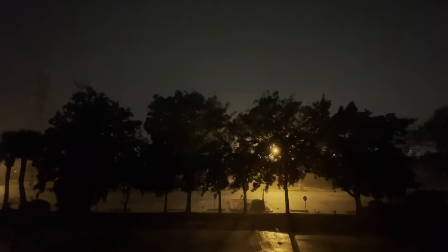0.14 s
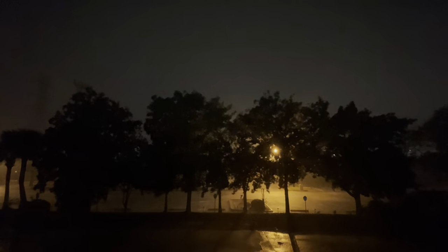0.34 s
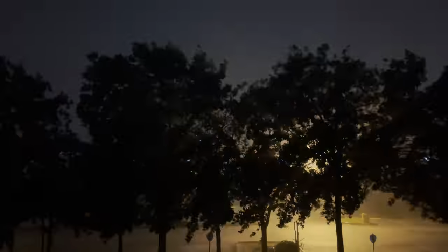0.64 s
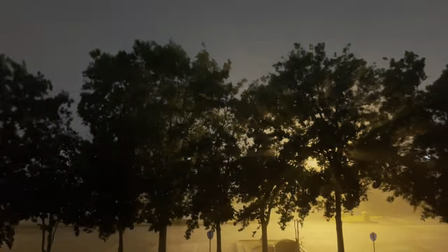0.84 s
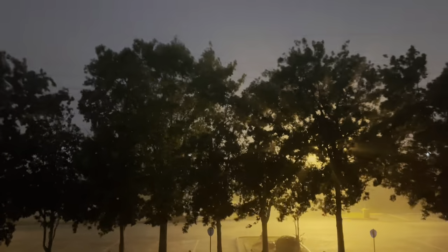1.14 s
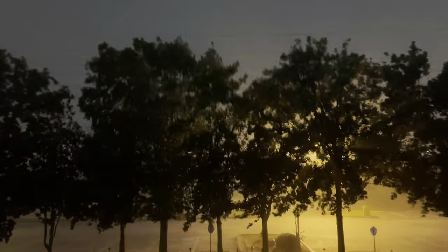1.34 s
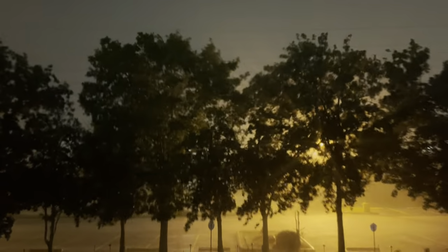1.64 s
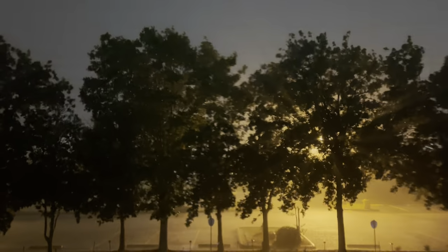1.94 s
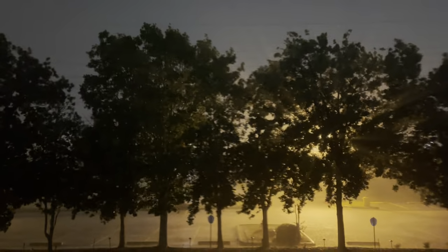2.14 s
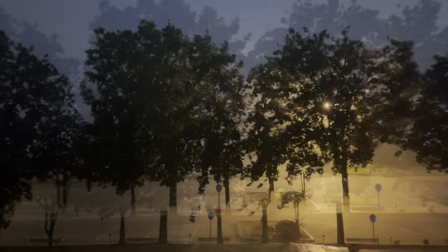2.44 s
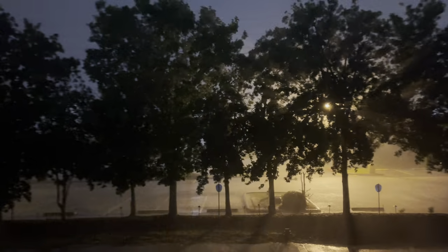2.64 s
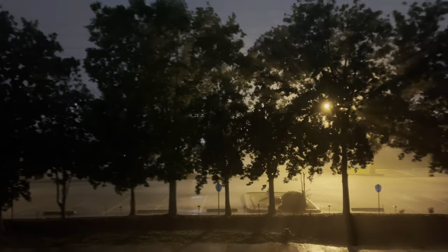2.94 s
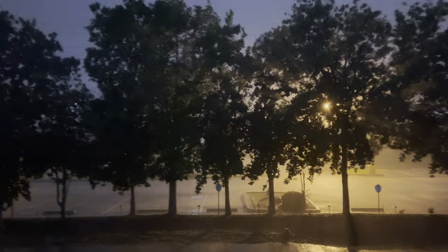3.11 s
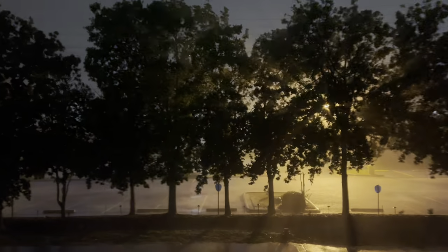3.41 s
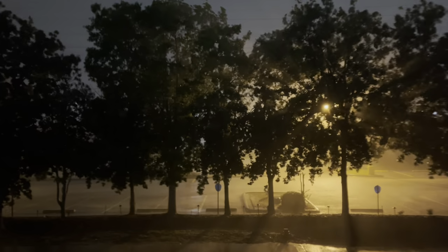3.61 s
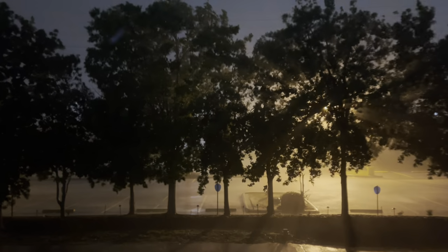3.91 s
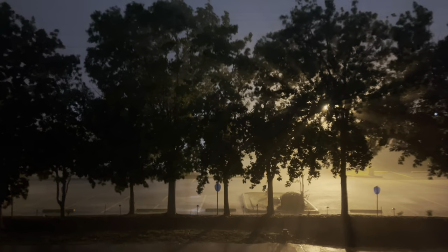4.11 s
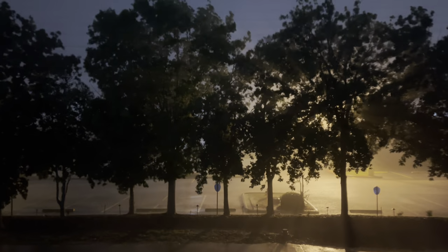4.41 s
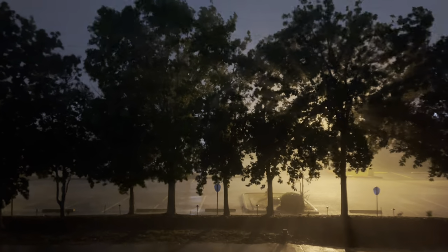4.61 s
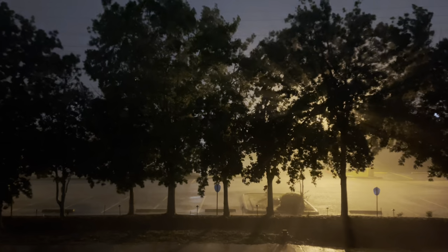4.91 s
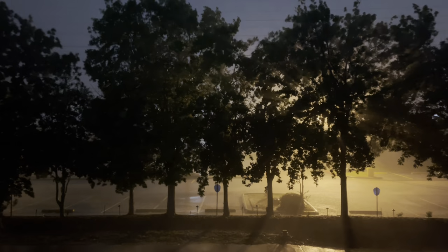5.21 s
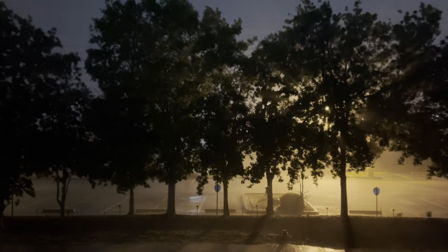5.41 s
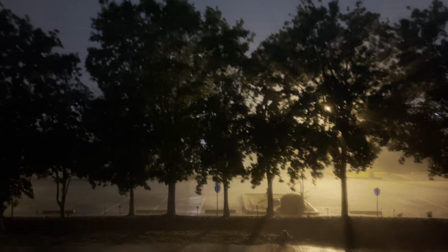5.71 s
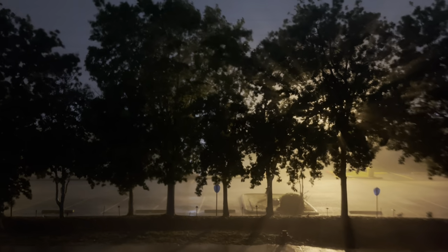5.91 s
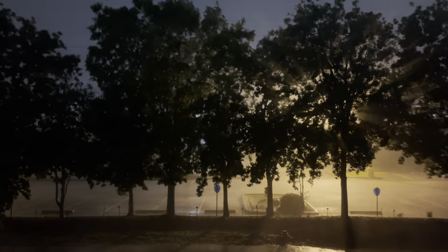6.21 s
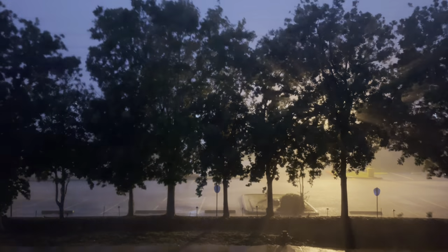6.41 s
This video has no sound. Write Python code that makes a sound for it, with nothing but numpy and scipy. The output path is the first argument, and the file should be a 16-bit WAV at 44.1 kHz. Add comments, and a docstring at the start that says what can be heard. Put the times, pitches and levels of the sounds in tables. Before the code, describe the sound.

Heavy rain falls steadily, heard from under a thin shelter. It drums on the sheet overhead and patters and hisses on the leaves and paving around, while small drops tick close to the microphone. The sound dips briefly near the start, then one big drop gives a sharp, hollow click. A dull double bump comes midway, and bigger drops tap overhead more often afterwards. Distant thunder rumbles low throughout.

```python
"""Night rain under a thin shelter

Heavy rain drums on the sheet overhead, patters and hisses on the leaves and paving around, and ticks
close to the microphone. One big drop raps something hollow, there is a dull double bump, and far thunder
rolls underneath. The hand-held pair of microphone ports is held in three grips in turn, each with its
own colour and stereo image. The level dips briefly, once."""
import sys
import numpy as np
from scipy import signal
from scipy.fft import rfft, irfft, next_fast_len
from scipy.io import wavfile

SR = 44100
rng = np.random.default_rng(int(sys.argv[2]) if len(sys.argv) > 2 else 0)


def generate_wav(sig):
    """Save sig (samples, or channels by samples) to the path in sys.argv[1] as 16-bit PCM at SR."""
    pcm = np.round(np.clip(np.atleast_2d(sig).T, -1, 1) * 32767).astype(np.int16)
    wavfile.write(sys.argv[1], SR, pcm)


N = 288855

# low and high modes of the sheet overhead: f/Hz, level/dB, t60/s
SHEET_LOW_MODES = [(245, 3, 0.017), (345, 3, 0.045), (432, 2.5, 0.029), (513, -0.5, 0.032),
                   (640, -5.5, 0.053), (734, -6, 0.057), (918, -3.5, 0.018)]
SHEET_HIGH_MODES = [(1107, -4.5, 0.017), (1390, 5.5, 0.0066), (1800, 1.5, 0.016), (2250, -16, 0.0096),
                    (2744, 3, 0.0095), (3500, -16, 0.0007)]
# big drops on it: t/s, favoured low f/Hz, its level/dB, favoured high f/Hz, its level/dB
HEAVY_DROPS = [(.283, 700, -30, 1400, -31), (.302, 500, -35, 1300, -31), (0.668, 600, -53, 1640, -29.5),
               (.853, 751, -29, 1660, -35), (.906, 600, -51, 1740, -30), (0.985, 600, -33, 1510, -29),
               (1.03, 905, -33, 1810, -31), (1.12, 705, -29, 1720, -27), (1.137, 764, -31, 1500, -19.5),
               (1.217, 634, -24, 1810, -24.5), (1.281, 890, -29, 1310, -25), (1.395, 600, -29, 1510, -31),
               (1.46, 600, -47, 1820, -35), (1.51, 900, -35, 1880, -30.5), (1.661, 301, -52, 1760, -24),
               (1.843, 830, -27.5, 1410, -24), (1.883, 600, -42, 1870, -29), (1.91, 800, -33, 1760, -21),
               (1.932, 714, -31, 1200, -26), (1.944, 513, -24, 1420, -22.5), (2.0098, 600, -53, 2570, -48),
               (2.046, 600, -28, 1850, -24), (2.091, 930, -27, 1300, -50), (2.187, 308, -62, 1800, -29),
               (2.225, 497, -34, 1930, -28), (2.326, 450, -28, 1930, -26), (3.383, 313, -34.5, 2250, -23),
               (3.639, 390, -26, 2150, -21.5), (3.663, 370, -25, 2140, -32), (3.727, 402, -24, 1800, -45),
               (3.775, 620, -22, 1200, -25), (3.953, 367, -23, 2340, -29), (4.081, 398, -29, 2150, -24.5),
               (4.234, 487, -23.5, 2400, -29), (4.2525, 597, -39, 1300, -33), (4.502, 345, -22, 1770, -20),
               (4.617, 436, -23, 2260, -25.5), (4.668, 610, -19, 2110, -35), (4.692, 434, -24, 2200, -27.5),
               (4.829, 307, -36, 1800, -23), (4.865, 432, -20.5, 1340, -20), (4.933, 470, -27, 2230, -29),
               (5.2132, 700, -35, 1200, -29), (5.218, 410, -21, 2020, -25.5),
               (5.552, 336, -25, 2180, -24.5), (5.634, 345, -20, 2150, -23.5), (5.681, 468, -24, 2180, -22),
               (5.725, 546, -19.5, 1910, -37), (5.752, 447, -44, 2130, -25.5),
               (5.837, 348, -20.5, 2170, -24), (5.926, 450, -21, 1320, -23.5), (5.975, 520, -24, 2450, -22),
               (6.103, 310, -20, 2520, -19.5), (6.154, 363, -30, 2020, -22), (6.305, 405, -23.5, 2250, -32),
               (6.4795, 695, -28.5, 2160, -21)]


def heavy_drops(fall_db_per_octave=19, slap_db=-11, slap_t60_s=0.042):
    """Big drops slap the sheet and strike hardest the modes nearest those favoured where they land."""
    s, low_hz, low_db, high_hz, high_db = np.transpose(HEAVY_DROPS)
    at, out = np.round(s * SR).astype(int) + 25, np.zeros(N)
    modes = SHEET_LOW_MODES + SHEET_HIGH_MODES
    chance_db = rng.normal(0, 1, (len(at), len(modes)))
    for k, (hz, _, t60) in enumerate(modes):
        favoured_hz, top_db = (low_hz, low_db) if k < len(SHEET_LOW_MODES) else (high_hz, high_db)
        strength_db = top_db - fall_db_per_octave * abs(np.log2(hz / favoured_hz)) + chance_db[:, k]
        out += (-1) ** k * ring(clicks(at, strength_db), hz, t60)   # neighbours start in opposite sense
    slap = decay(clicks(at, high_db + slap_db) + 1e-18, slap_t60_s) * rng.standard_normal(N)
    out += butter(slap, 2, [500, 3500], "band")
    return butter(out, 2, 6000)   # the wet contact is soft


def drumming(level_db, per_s, modes):
    """Steady rain overhead: each drop lands somewhere else on the sheet, so it favours other modes."""
    hits = impacts(per_s, spread_db=2.5)
    rings = sum(from_db(db) * ring(hits * rng.standard_normal((2, N)), hz, t60) for hz, db, t60 in modes)
    return from_db(level_db) * rms_one(butter(rings, 4, 6000))


# small drops right by the microphone: t/s, peak/dB, lower edge/Hz, upper edge/Hz, gain at 6 kHz/dB
CLOSE_TICKS = [(.2438, -23, 5000, 12000, -2), (.2838, -33, 4000, 8000, -5), (0.303, -21, 1500, 7000, 0),
               (0.37, -22, 5000, 12500, -6), (1.303, -9.5, 4750, 14000, -3), (1.778, -19, 2170, 10000, -4),
               (1.843, -21.5, 900, 7000, -7), (1.9112, -17, 1200, 11000, -10),
               (1.9332, -19, 2000, 7000, -5), (1.9452, -22, 1500, 6000, 0), (1.968, -23, 2500, 7000, -2),
               (2.0468, -35, 1000, 4500, -4), (2.255, -18, 1300, 9000, -17), (2.375, -27, 4500, 8000, 0),
               (2.442, -9, 2660, 9600, -7), (2.503, -30, 2500, 9000, -2), (2.517, -33, 6500, 11000, 7),
               (2.533, -29, 3000, 9000, -6), (2.5436, -24, 2500, 9500, -8), (2.551, -24, 2300, 9500, -7),
               (2.557, -25, 3000, 9500, -8), (2.5852, -17, 2900, 11000, -11),
               (2.6082, -18, 2800, 10500, -7), (2.6167, -18, 2500, 10000, -13),
               (2.6265, -24, 2600, 10000, -13), (2.6533, -29, 2600, 9000, -8),
               (3.429, -22, 1800, 12500, -10), (3.4925, -18.5, 6500, 12400, 0),
               (3.505, -23, 6500, 11000, -3), (3.6012, -18, 8400, 12300, 3),
               (3.6045, -17, 10000, 12400, -2), (3.7561, -23, 2200, 4000, -6),
               (4.0947, -20, 4000, 10000, -3), (4.252, -25, 1200, 4000, 2), (4.2538, -16, 2600, 11100, -8),
               (4.2825, -15, 2200, 12000, -12), (4.2857, -24, 1800, 9500, 10),
               (4.533, -16.5, 1800, 8500, -2), (4.6802, -23, 4000, 8000, 0), (4.728, -22.5, 5600, 7500, 0),
               (5.213, -27, 8500, 12400, 12), (5.892, -11.5, 2020, 3280, 8), (5.974, -24, 1300, 3200, 7),
               (6.1029, -17, 1100, 2880, 9), (6.479, -25, 5000, 9500, 20)]


def ticks(t60_s=0.007, length=1024):
    """A small drop bursts with a snap and a spit of noise, often hollow in the middle of its band."""
    out = np.zeros(N)
    spits = rng.standard_normal((len(CLOSE_TICKS), length)) * from_db(-60 * np.arange(length) / SR / t60_s)
    spits[:, 0] = 5   # the opening snap
    middle = signal.iirpeak(6000, Q=2, fs=SR)
    for spit, (s, peak_db, low_hz, high_hz, middle_db) in zip(spits, CLOSE_TICKS):
        tick = butter(spit, 3, [low_hz, high_hz], "band")
        tick = butter(butter(tick, 1, 7000), 5, 12300)   # softened above 7 kHz, cut steeply above 12.3
        tick -= (1 - from_db(middle_db)) * signal.lfilter(*middle, tick)
        at = round(s * SR) + 30
        out[at:at + length] += from_db(peak_db) * tick / abs(tick).max()
    return out


# modes of something hard and hollow close by: f/Hz, level/dB, t60/s
HOLLOW_MODES = [(517, -1, 0.033), (704, -6, 0.0165), (1500, -14, 0.033), (1810, -1.5, 0.012),
                (2500, 6.5, 0.0058), (2970, -19, 0.0078)]


def knock(at_s=1.3036, strike_db=-10.5):
    """One very big drop strikes all modes of the hollow thing at once, low and high in opposite sense."""
    strike = clicks(round(at_s * SR), strike_db)
    rings = sum((1 if hz < 1000 else -1) * from_db(db) * ring(strike, hz, t60)
                for hz, db, t60 in HOLLOW_MODES)
    return butter(rings, 3, [300, 4200], "band")   # too small to radiate bass; soft wet contact


# a dull double bump at the microphone: t/s, level/dB, f/Hz, t60/s
BUMPS = [(3.1872, -16, 200, .03), (3.1942, -14, 130, .04)]


def thud():
    """Two soft, low knocks that pull inward first and die quickly."""
    knocks = sum(ring(-clicks(round(s * SR), db), hz, t60) for s, db, hz, t60 in BUMPS)
    return butter(knocks, 2, [70, 380], "band")


# spectrum of rain on the leaves and paving around the shelter: f/Hz, density/dB
PATTER_SPECTRUM = [(200, -6.5), (400, 1), (900, -5.5), (1300, -3), (2100, -1), (2800, -3.5), (3800, -7.5),
                   (5000, -14.5), (7000, -30)]


def patter(level_db, gust):
    """Drops of very uneven size splash on leaves and paving, swelling with the gusts."""
    flicker_db = 1.4 * gust + 0.076 * drift(27)
    return splashes(level_db + flicker_db, PATTER_SPECTRUM, per_s=550, spread_db=5.5, far=1.5)


# close splashes as heard, with the top cut off steeply near 12.5 kHz: f/Hz, density/dB
SPATTER_SPECTRUM = [(500, -14), (1000, 2), (2000, 5.5), (4000, -11), (7000, -9), (11500, -4), (12500, -40)]


def spatter(level_db, gust):
    """Scattered close splashes, sparse enough to be heard singly."""
    return splashes(level_db + 0.5 * gust, SPATTER_SPECTRUM,
                    per_s=35, spread_db=3.5, far=0.046, t60_s=0.041)


# rain hiss as heard, with the top cut off steeply near 12.6 kHz: f/Hz, density/dB
HISS_SPECTRUM = [(3000, 1.5), (4500, 1), (6000, 0), (7000, -1), (8500, 0), (10500, -0.5), (11500, -4.5),
                 (12100, -12.5), (12600, -16), (13100, -50)]


def hiss(patter_db, gust, mean_db=-44):
    """Far drops merge into a flickering hiss that follows half of the patter's swing."""
    level_db = mean_db + 0.5 * (patter_db - patter_db.mean())
    flicker_db = 0.087 * gust + 1.16 * drift(37)
    return splashes(level_db + flicker_db, HISS_SPECTRUM, per_s=800, spread_db=1.5, far=1.6)


# spectra of the far thunder, its roll and its deepest part: f/Hz, density/dB
ROLL_SPECTRUM = [(44, -7.5), (75, 0), (119, 0), (194, -13), (260, -7.5), (340, -23), (570, -120)]
DEEP_SPECTRUM = [(22, -20), (30, -9), (48, 5), (61, 17.5), (70, -4), (85, -14), (110, -38)]
# thunder as it reaches the shelter: t/s, roll level/dB, deep level/dB
THUNDER_LEVELS = [(0, -33.5, -50), (.45, -36.5, -45), (1, -35.5, -43), (1.4, -35.5, -35.5),
                  (1.8, -32.5, -48), (2.25, -34, -90), (2.6, -37, -42), (3.1, -37, -44),
                  (3.55, -39.5, -40.5), (4, -36.5, -41), (4.3, -34, -40), (4.9, -35, -42), (5.4, -35, -39),
                  (5.7, -35, -40), (6.1, -37, -45), (6.55, -35.5, -41)]


def thunder():
    """Far thunder: low noise that rolls in slow lumps over a deeper, slower part."""
    roll_db, deep_db = in_time(THUNDER_LEVELS)
    roll = from_db(roll_db + drift(5)) * colour(rng.standard_normal((2, N)), ROLL_SPECTRUM)
    return roll + from_db(deep_db) * colour(rng.standard_normal((2, N)), DEEP_SPECTRUM)


# the microphone in each grip: f/Hz, right lead/rad, likeness/0-1, left over right/dB, colour/dB
FIRST_GRIP = [(20, 0, 1, 0, 0), (150, 0, .99, 0, 0), (300, 0, .9, 0, -2), (500, 1.2, .6, 1, -1),
              (800, 2.9, .3, 2, 4), (1500, 6.2, .6, 0, 2), (1900, 6.2, .9, 1, 0), (2900, 3.4, .5, -3, 3),
              (4000, 3, .2, -1, -2), (5200, -.3, .5, 0, 0), (6500, -.7, .45, -2, 0),
              (8500, -2.7, .65, -1, -2), (9800, -3.2, .95, 0, -1), (11400, -5.3, .75, 0, 0),
              (11900, -6, .93, 0, 1)]
SECOND_GRIP = [(20, 0, 1, 0, 0), (150, 0, .997, 0, 0), (400, .1, .95, 0, 0), (900, .5, .6, 1, 1),
               (1400, .2, .9, 0, 1), (1800, 0, .99, 0, 3), (2150, 0, .95, 0, -1), (2550, -.7, .7, -2, 2),
               (2900, -1.3, .35, -3, -1), (3600, -.4, .5, 2, 0), (4750, -3.14, .8, 0, -1),
               (5300, -5.3, .6, 0, 0), (5750, -6.28, 1, 0, 1), (6250, -6.28, 1, 0, 1),
               (7000, -7.4, .8, 0, 0), (8400, -9.42, 1, 0, -1), (9550, -9.43, 1, 0, -1),
               (10200, -10.2, .87, 0, 0), (11400, -11.5, .8, 0, 0), (11900, -12.3, .93, 0, 1)]
THIRD_GRIP = [(20, 0, 1, 0, 0), (80, 0, .985, -.3, 0), (200, 0, .8, 1, 0), (380, 0, .95, 1, 0),
              (500, -.1, .9, 2, 1), (1100, -.3, .1, 1, -2), (1700, 0, .3, 1, -2), (2200, -.2, .8, 4, 2),
              (2550, -1, .5, 5, -1), (2900, -.8, .7, 4, 0), (3300, -.6, .5, 3, -1), (3900, -.6, .8, 4, 2),
              (4500, -.7, .7, 3, 0), (5500, -.8, .45, 4, 0), (6400, -.3, .75, 2, 0), (7100, -1, .4, 5, -1),
              (7800, -.8, .78, 1, 0), (8700, 0, .92, 0, 1), (10250, 3.14, .97, 0, 1),
              (11400, 5.4, .8, 0, 1), (11900, 6, .93, 0, 0)]


def ports(fields, direct, grip):
    """The hand colours both ports; the right is phase-shifted and hears part of an unrelated field."""
    size = next_fast_len(N + 2048)
    hz = np.arange(size // 2 + 1) * SR / size
    grip_hz, *columns = np.transpose(grip)
    lead, alike, pan_db, colour_db = [np.interp(hz, grip_hz, c) for c in columns]
    one, other, near = rfft([*fields, direct], size) * from_db(colour_db)
    right = (alike * one + np.sqrt(1 - alike ** 2) * other + near) * np.exp(1j * lead)
    return irfft([(one + near) * from_db(pan_db / 2), right * from_db(-pan_db / 2)], size)[:, :N]


# the colour and stereo image change, first during the brief fade: start/s, end/s
IMAGE_CHANGES = [(.54, 0.59), (2.27, 2.56)]


def stereo_image(fields, direct):
    """The sound at the two ports cross-fades from one colour and stereo image to the next."""
    past_first, past_second = [np.interp(np.arange(N) / SR, span, [0, 1]) for span in IMAGE_CHANGES]
    return ((1 - past_first) * ports(fields, direct, FIRST_GRIP)
            + past_first * (1 - past_second) * ports(fields, direct, SECOND_GRIP)
            + past_second * ports(fields, direct, THIRD_GRIP))


def dip(at_s=0.544, depth_db=-30.16, fall_s=0.034, rise_s=0.05, curve=1.16):
    """Gain that fades out and back in once."""
    ramp, = in_time([(at_s - fall_s, 1), (at_s, from_db(depth_db / curve)), (at_s + rise_s, 1)])
    return ramp ** curve


def splashes(level_db, spectrum, per_s, spread_db, far, t60_s=0.028):
    """Short splash bursts from near drops over the smooth wash of far ones."""
    power = decay(impacts(per_s, spread_db) ** 2, t60_s / 2)   # power falls twice as fast as amplitude
    near = rms_one(np.sqrt(power) * rng.standard_normal((2, N)))
    return from_db(level_db) * colour(near + far * rng.standard_normal((2, N)), spectrum)


def impacts(per_s, spread_db):
    """Random drop impacts for two unrelated sound fields; a few are much bigger than the rest."""
    sizes = from_db(spread_db * np.minimum(rng.exponential(1, (2, N)), 4))
    signs = rng.choice([-1, 1], (2, N))
    return sizes * signs * (rng.random((2, N)) < per_s / SR)


def clicks(at, level_db):
    """Impulses at the given samples."""
    out = np.zeros(N)
    out[at] = from_db(level_db)
    return out


def ring(strikes, hz, t60):
    """A unit click sets a sine of height 1 ringing, with a t60 of at least 1 ms."""
    r, w = from_db(-60 / (max(t60, .001) * SR)), 2 * np.pi * hz / SR
    return signal.lfilter([0, np.sin(w)], [1, -2 * r * np.cos(w), r * r], strikes + 1e-18)


def decay(strikes, t60):
    """Give each click an exponential tail."""
    return signal.lfilter([1], [1, -from_db(-60 / (t60 * SR))], strikes)


def drift(hz, step=40):
    """Slow random wander of spread 1: coarse noise through a double one-pole low-pass."""
    r = np.exp(-2 * np.pi * hz * step / SR)
    slow = signal.lfilter([1], [1, -2 * r, r * r], rng.standard_normal(N // step + 2002))[2000:]
    return np.interp(np.arange(N) / step, np.arange(len(slow)), rms_one(slow))


def colour(x, spectrum):
    """Give x a spectrum (f/Hz, density/dB), closed outside its ends; rms 1."""
    size = next_fast_len(N)
    hz, points = np.arange(1, size // 2 + 2) * SR / size, np.array(spectrum)
    db = np.interp(np.log(hz), np.log(points[:, 0]), points[:, 1], left=-80, right=-80)
    return rms_one(irfft(rfft(x, size) * from_db(db), size)[..., :N])


def butter(x, order, hz, kind="low"):
    """Low-pass or band-pass x."""
    return signal.sosfilt(signal.butter(order, hz, kind, fs=SR, output="sos"), x)


def in_time(rows):
    """Columns of a curve table, one value per sample."""
    s, *columns = np.transpose(rows)
    return [np.interp(np.arange(N) / SR, s, c) for c in columns]


def from_db(db):
    """Decibels to gain."""
    return 10 ** (np.asarray(db) / 20)


def rms_one(x):
    """Scale each row to rms 1."""
    return x / np.sqrt(np.mean(x ** 2, axis=-1, keepdims=True) + 1e-20)


# the rain from under the shelter: t/s, drumming level/dB, patter level/dB
RAIN_LEVELS = [(0.0, -42.5, -43), (0.5, -39, -41), (1.13, -43, -43), (1.37, -38.5, -40.5), (1.68, -38, -41),
               (2.1, -36.5, -37), (2.35, -39, -41), (2.6, -45, -44), (2.94, -47, -43.5), (3.23, -41, -42.5),
               (3.37, -40.5, -41.5), (3.74, -38.5, -39), (4.16, -39.5, -39), (4.56, -33, -36),
               (4.76, -41, -39.5), (4.93, -37.5, -38.5), (5.22, -41, -41), (5.44, -40, -40),
               (5.73, -35, -36), (5.98, -37, -38), (6.26, -42.5, -41), (6.55, -38.5, -40.5)]


def scene():
    """Rain and thunder all around and single drops close by, at a microphone held under the sheet."""
    drumming_db, patter_db = in_time(RAIN_LEVELS)
    gust = drift(9)   # sheets of rain change every rain layer together
    density = from_db(3 * gust)
    fields = thunder() + drumming(drumming_db, 500 * density, SHEET_LOW_MODES)
    # small hard drops reach only the high modes
    fields += drumming(patter_db - 8.5, 220 * density, SHEET_HIGH_MODES)
    fields += patter(patter_db, gust) + hiss(patter_db, gust) + spatter(patter_db - 12.5, gust)
    direct = heavy_drops() + ticks() + knock() + thud()
    return stereo_image(fields, direct) * dip()


def record(dry):
    """The top is cut steeply, 70 dB down from 16 kHz."""
    return signal.sosfilt(signal.cheby2(12, 70, 16000, fs=SR, output="sos"), dry)


dry = scene()
out = record(dry)
generate_wav(out)
```